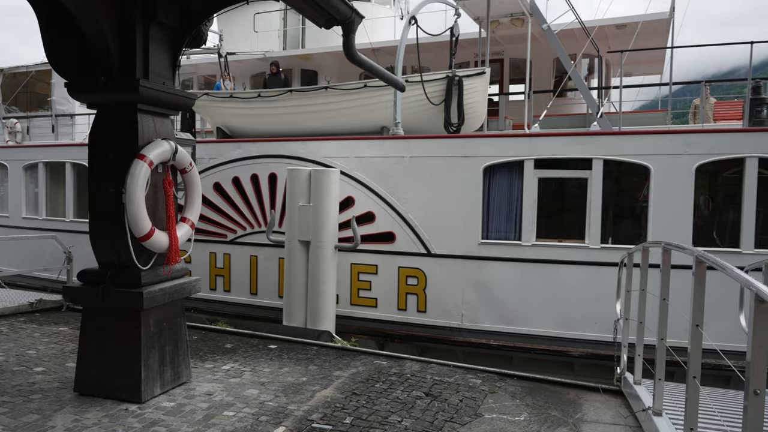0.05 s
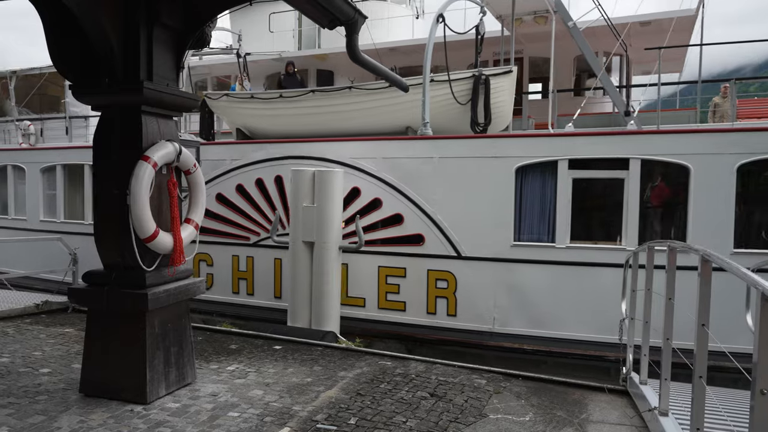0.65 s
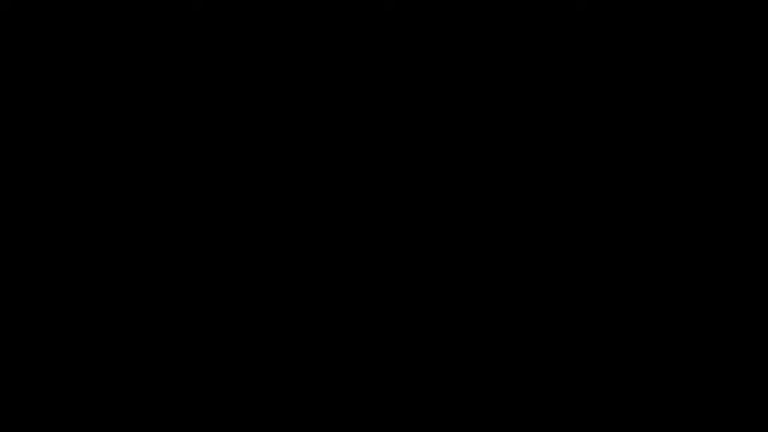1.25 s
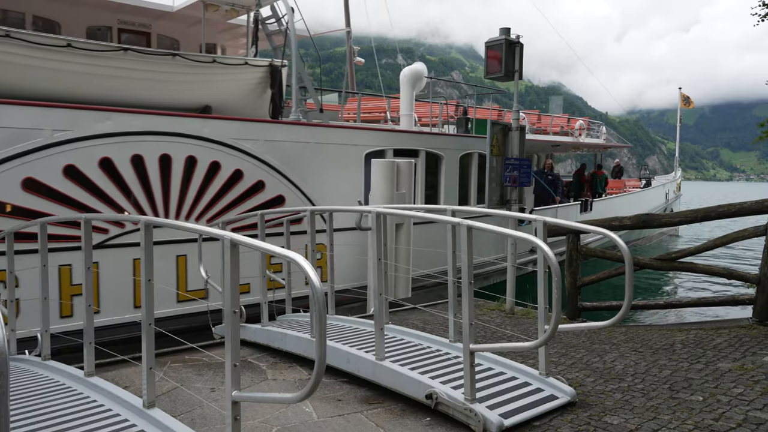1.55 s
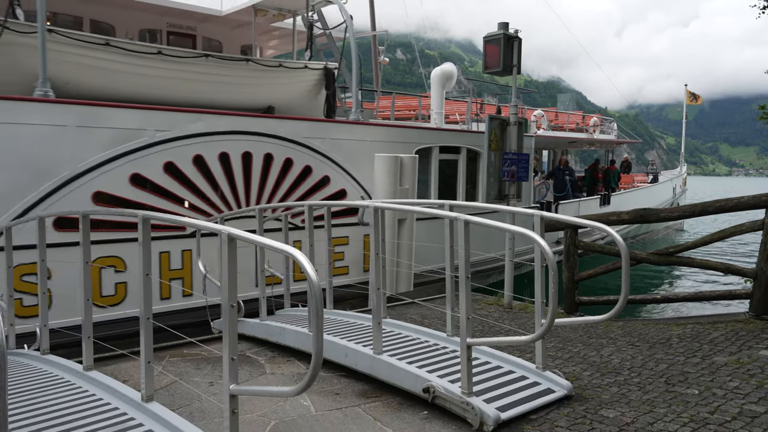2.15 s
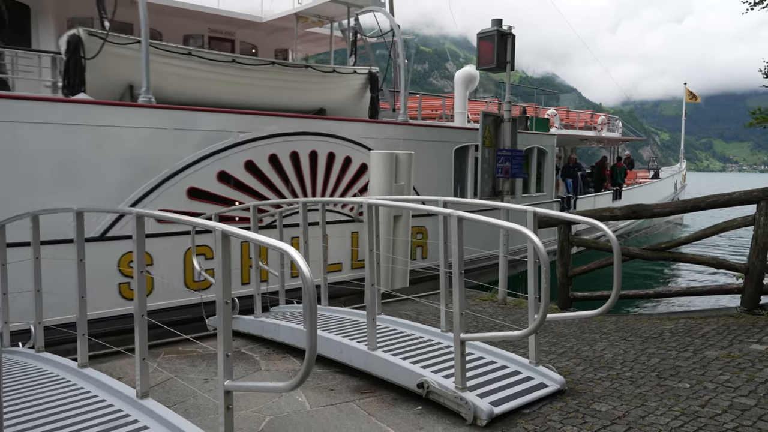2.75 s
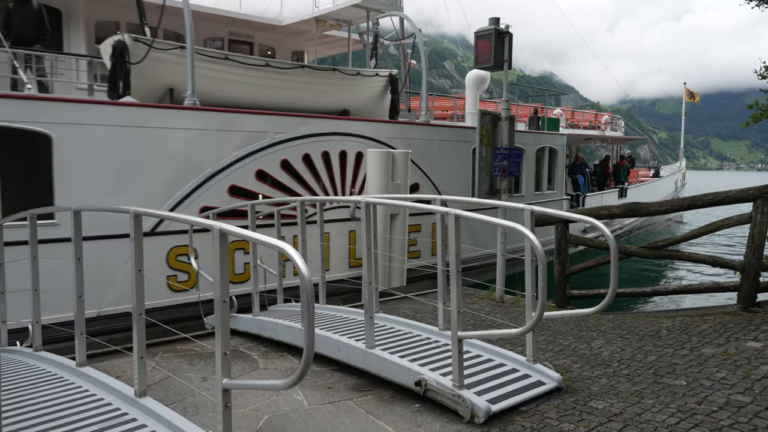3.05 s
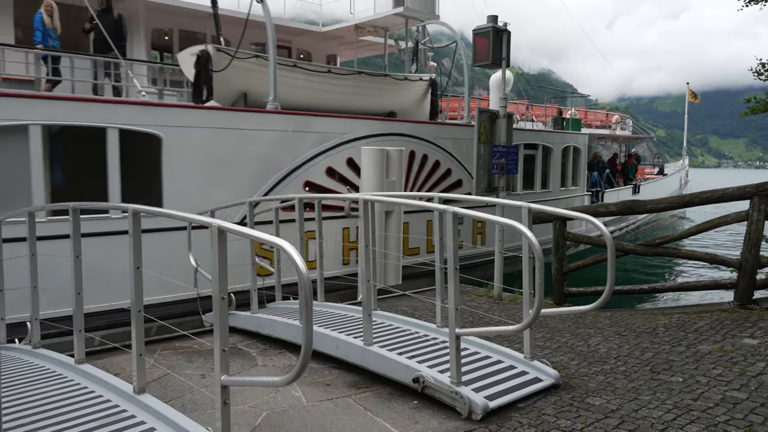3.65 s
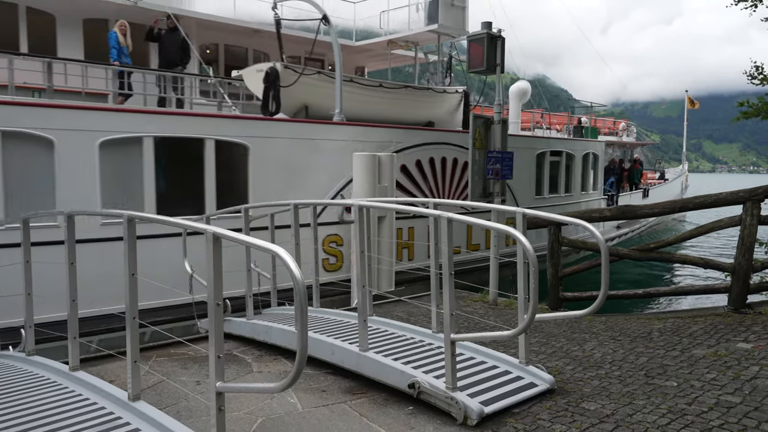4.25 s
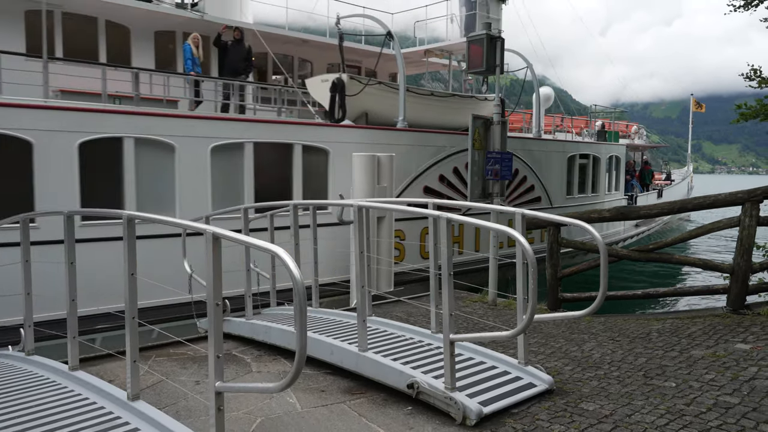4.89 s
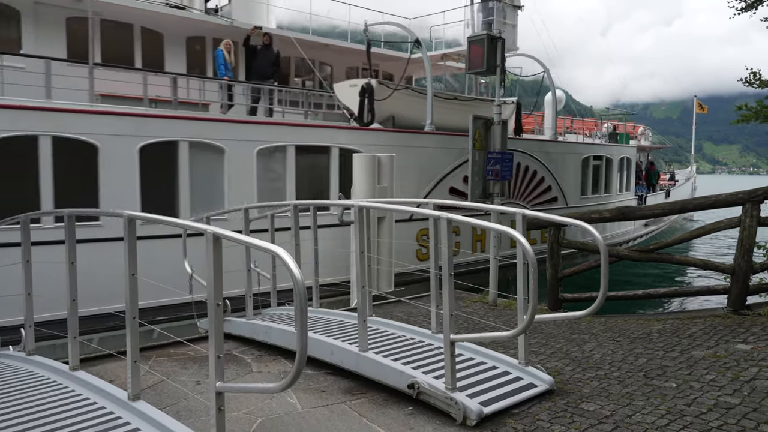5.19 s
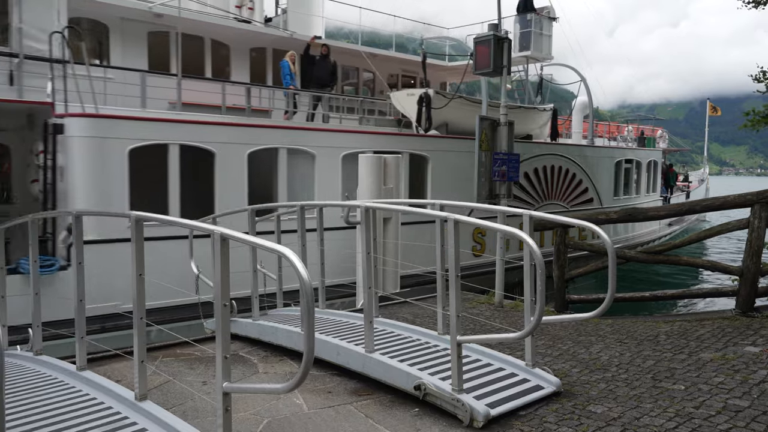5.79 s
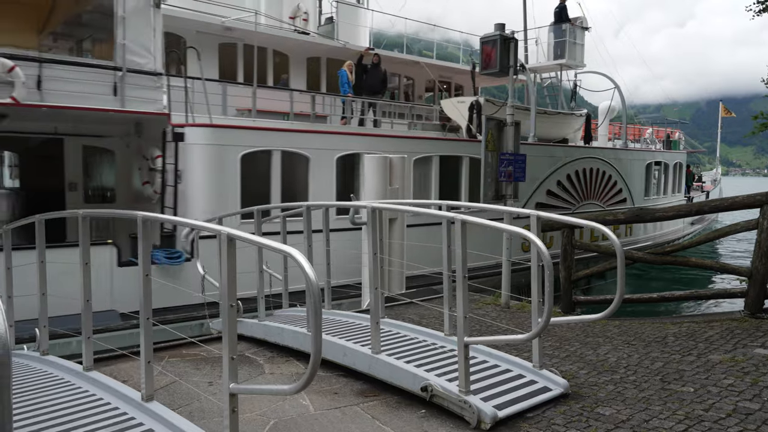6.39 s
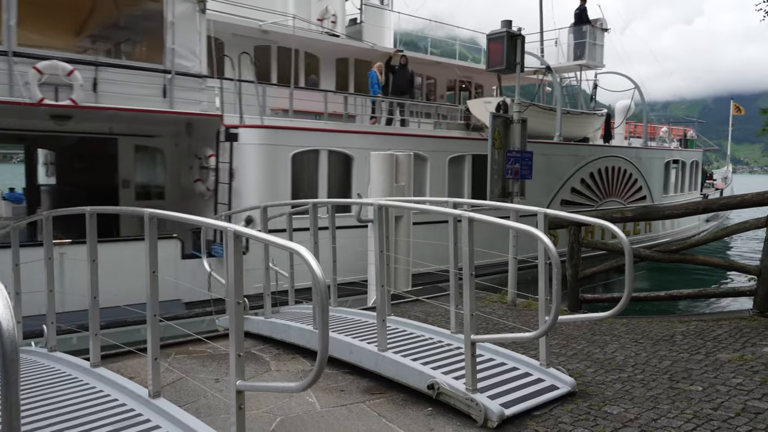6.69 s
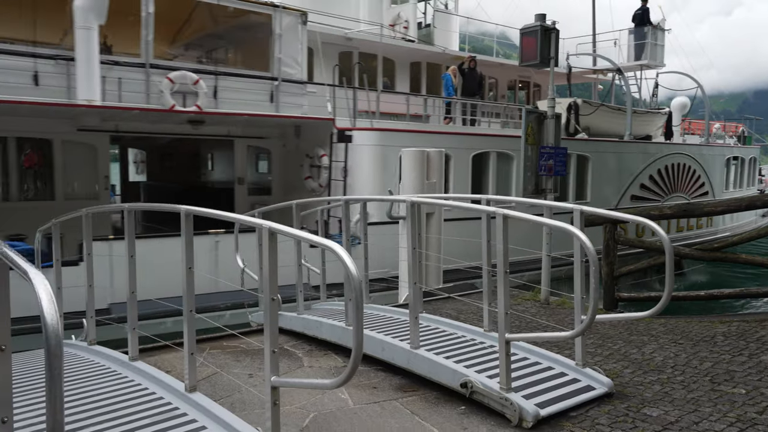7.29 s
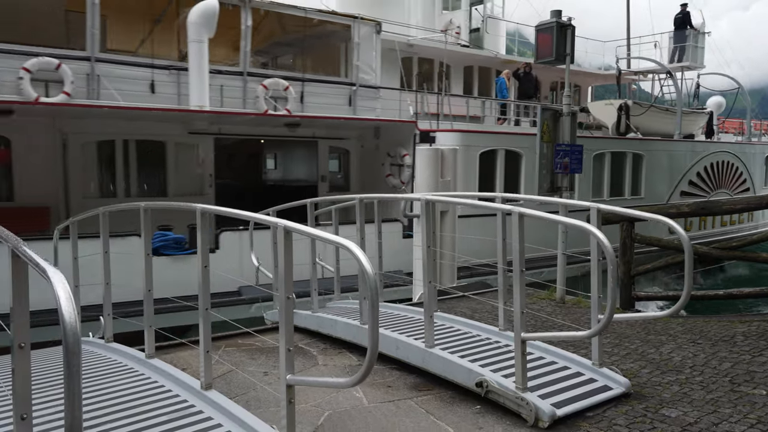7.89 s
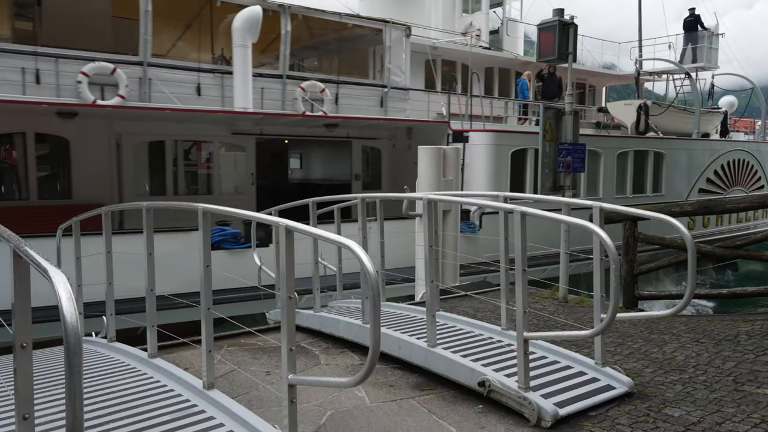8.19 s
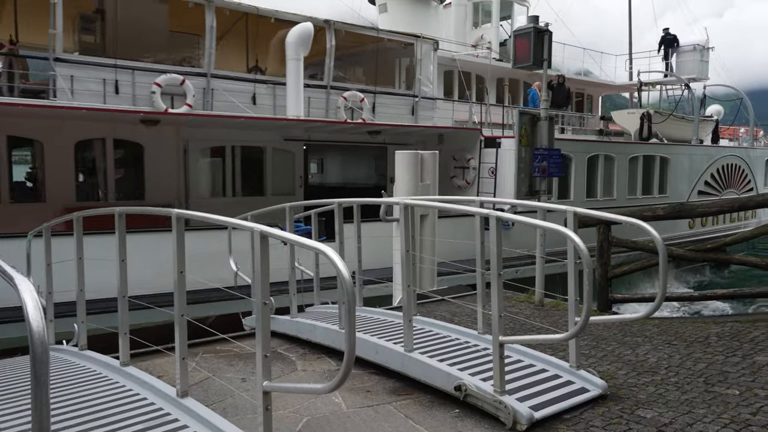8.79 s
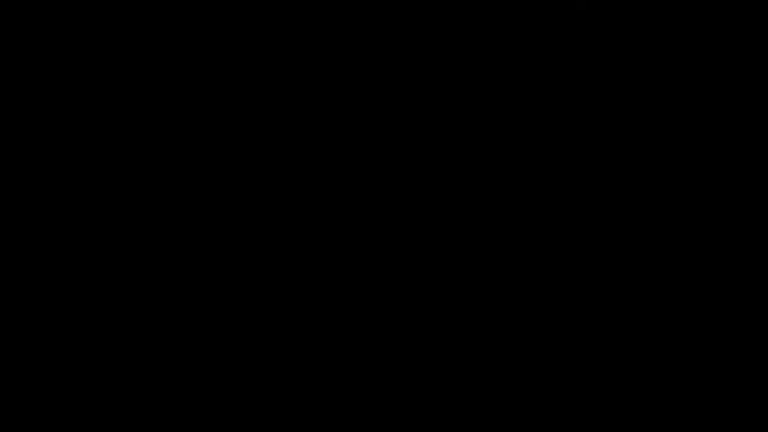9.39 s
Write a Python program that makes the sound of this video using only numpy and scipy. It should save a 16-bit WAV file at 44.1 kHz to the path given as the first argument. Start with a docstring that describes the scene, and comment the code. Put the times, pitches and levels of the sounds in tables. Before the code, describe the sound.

Rushing, bubbling water and hissing spray from a departing paddle steamer, with engine rumble beneath and a brief wind buffet early on.

```python
"""Paddle steamer leaving a stone quay

The wheel's floats beat air into the lake: small bubbles rush, big pockets gurgle and spray hisses,
over the rumble of the machinery. The microphone first faces the wheel and catches a gust.
After a short silence it is turned along the quay, and the wheel slowly recedes, left to right."""
import sys
import numpy as np
from scipy import signal
from scipy.fft import rfft, irfft, next_fast_len
from scipy.io import wavfile

SR = 44100
rng = np.random.default_rng(int(sys.argv[2]) if len(sys.argv) > 2 else 0)


def to_wav(s):
    """Save 16-bit WAV."""
    ch = np.atleast_2d(s).T  # columns
    pcm = np.round(np.clip(ch, -1, 1) * 32767)  # PCM
    wavfile.write(sys.argv[1], SR, pcm.astype(np.int16))


N = 420713
TIME_S = np.arange(N) / SR
FFT_SIZE = next_fast_len(N, True)
BINS_HZ = np.fft.rfftfreq(FFT_SIZE, 1 / SR)

# microphone on: start/s, fade-in/s, stop/s
STRETCHES = [(-.002, 0.0019, 1.207), (1.574, .022, 9.317)]
# air pockets dragged under: t/s, level/dB, f/Hz, swell of the wash/dB
AIR_GULPS = [(.85, -36, 220, 0), (1.62, -34, 270, .8), (2.0, -36, 190, 0.3), (3.1, -37.5, 260, 0),
             (3.8, -38, 220, 0), (4.33, -36, 280, 0.2), (5.2, -39, 230, .5), (6.07, -35, 175, 0.5),
             (6.52, -37.5, 190, .3), (7.6, -38.5, 290, .8)]

TURN_S, TURN_FADE_S = STRETCHES[1][:2]
TURNED = TIME_S > TURN_S - TURN_FADE_S


def wash(floats_per_s=3.3, far_from_s=3.0, far_over_s=4.1):
    """Small bubbles in turbulent water surge as each float dips; the colour turns hollow along the quay."""
    # wash spectra, near and far: f/Hz, level/dB
    near_spectrum = [(330, -24), (480, 0), (700, 0), (1000, -4), (1700, -4), (2300, -6), (3000, -13.5),
                     (4200, -23)]
    far_spectrum = [(330, -17.5), (510, -3), (680, 1), (1020, -6), (1320, -2), (1650, -5), (2150, -6),
                    (2800, -11.5), (4200, -21)]
    beat = np.cos(2 * np.pi * (floats_per_s * (TIME_S - 2.0) + .06 * drift(rate_hz=.93)))
    swarm = bubbles(low_hz=416, high_hz=3556, cycles=4.0, spread_db=.5, count=30000, samples=260)
    water = mic_pair(swarm + gain_of(8) * noise())
    far_share = np.where(TURNED, np.clip((TIME_S - far_from_s) / far_over_s, .15, 1), .89)
    water = (1 - far_share) * colour(water, near_spectrum) + far_share * colour(water, far_spectrum)
    gulp_db = sum(db * gulp_envelope(at_s) for at_s, _, _, db in AIR_GULPS)
    swell = gain_of(gulp_db + .3 * beat + .15 * drift(rate_hz=4))
    return water * swell * wheel_gain(base_db=-34.5, db_per_db=.68, facing_db=.3)


def gurgle(hollow_hz=315, sink_from_s=3.5, sink_hz_per_s=11.6):
    """Big air pockets boom in the paddle box; the hollow note between hull and quay wanders, then sinks."""
    pockets = bubbles(low_hz=120.5, high_hz=556.6, cycles=3.5, spread_db=.43, count=10000, samples=1100)
    # churn spectrum: f/Hz, level/dB
    spectrum = [(110, -20), (160, -9), (190, -1.5), (250, -1.5), (330, -1.5), (410, -3), (480, -9),
                (620, -28)]
    churn = colour(mic_pair(pockets + gain_of(4.5) * noise()), spectrum)
    note_hz = hollow_hz - sink_hz_per_s * np.maximum(TIME_S - sink_from_s, 0)
    hollow = resonate(mic_pair(noise()), note_hz * (1 + .059 * drift(rate_hz=5.5)), width_hz=90)
    water = unit_rms(churn + gain_of(-5.5) * hollow)
    return water * wheel_gain(base_db=-34.5, db_per_db=.8, facing_db=-.6)


def gulps():
    """Now and then a float drags down a big pocket of air, which booms at its own pitch."""
    boom = resonate(mic_pair(noise()), over_time(AIR_GULPS, column=2), width_hz=130)
    return boom * sum(gain_of(db) * gulp_envelope(at_s) for at_s, db, _, _ in AIR_GULPS)


def spray(mist_from_hz=9000, mist_facing_db=-1, mist_turned_db=1.5):
    """Countless drops fall back as hiss; the finest mist gives the top treble."""
    # spray spectrum: f/Hz, level/dB
    spectrum = [(2000, -16.5), (3000, 1), (3500, 0.5), (4400, -0.5), (5200, -.5), (6100, 1.5), (8500, -1),
                (11500, -2), (15500, -3)]
    drops = noise() * gain_of(1.1 * noise())
    hiss = colour(mic_pair(drops), spectrum)
    mist = signal.sosfiltfilt(signal.butter(1, mist_from_hz, "high", fs=SR, output="sos"), hiss)
    hiss += mist * (gain_of(np.where(TURNED, mist_turned_db, mist_facing_db)) - 1)
    flicker = gain_of(.08 * drift(rate_hz=20))
    return hiss * flicker * wheel_gain(base_db=-34.5, db_per_db=1, facing_db=1.5)


def slaps():
    """Sheets of water slap down: a quick swell, a short tail."""
    # slaps: t/s, peak/dB, length/s
    hits = [(.845, -29, .017), (1.69, -38, .02), (2.445, -35, .004)]
    # slap spectrum: f/Hz, level/dB
    spectrum = [(700, -22), (1700, -5), (3000, 0), (4500, -6), (7000, -12), (14000, -24)]
    envelope = np.zeros(N)
    for at_s, db, length_s in hits:
        age = 2 * np.maximum(TIME_S - at_s, 0) / length_s
        envelope += gain_of(db) * age * np.exp(1 - age)
    return envelope * colour(noise(), spectrum)


def machinery():
    """Engine and hull rumble, throbbing unevenly and swelling as openings in the ship's side pass."""
    # rumble spectrum: f/Hz, level/dB
    spectrum = [(20, -22), (35, -15.5), (58, -4), (85, -0.5), (150, -0.5), (185, -2), (260, -26.5)]
    # passing openings: t/s, swell/dB, half length/s
    openings = [(5.9, 2, .5), (7.7, 2.5, 0.25)]
    swell_db = sum(db * np.exp(-((TIME_S - at_s) / half_s) ** 2) for at_s, db, half_s in openings)
    rumble = colour(mic_pair(noise()), spectrum) * wheel_gain(base_db=-41, db_per_db=.55, facing_db=3.3)
    return rumble * gain_of(swell_db + .62 * drift(rate_hz=4.4))


def wind(breeze_db=-54.5, gust_db=-40.5, start_s=.58, rise_s=.24):
    """A breeze swells to a gust, buffeting each microphone port separately; gone after the turn."""
    # buffeting spectrum: f/Hz, level/dB
    spectrum = [(40, -14.5), (80, -6.5), (130, 3.5), (200, -7), (300, -12), (500, -25.5)]
    level_db = np.interp(TIME_S, [start_s, start_s + rise_s], [breeze_db, gust_db])
    return colour(noise(), spectrum) * ~TURNED * gain_of(level_db + 3 * drift(rate_hz=21))


def wind_thumps(hz=150, half_s=.0031):
    """Each puff pulls and pushes the diaphragms once, one harder than the other."""
    # puffs: t/s, level/dB, left-right/dB
    puffs = [(.833, -17.5, 4.5), (.92, -19.5, -1), (0.978, -22, 1), (1.063, -26.5, -6.5), (1.121, -24, 9)]
    out = np.zeros((2, N))
    for at_s, db, side_db in puffs:
        age_s = TIME_S - at_s
        pulse = np.sin(2 * np.pi * hz * age_s) * np.exp(-(age_s / half_s) ** 2)
        out += gain_of([[db + side_db / 2], [db - side_db / 2]]) * pulse
    return out


def wheel_gain(base_db, db_per_db, facing_db, usual_db=-38.5):
    """Gain of a layer that follows the wheel's loudness, with facing_db added before the turn."""
    # wheel working up, then receding: t/s, level/dB
    facing = [(0.0, -39.5), (0.6, -40), (0.848, -37), (1.2, -38.5)]
    leaving = [(1.62, -36.5), (3.63, -38), (4.01, -39), (5.38, -38.5), (6.39, -40.5), (6.94, -40.5),
               (9.02, -44), (9.3, -43.5)]
    excess_db = over_time(facing + leaving) - usual_db
    return gain_of(base_db + db_per_db * excess_db + np.where(TURNED, 0, facing_db))


def bubbles(low_hz, high_hz, cycles, spread_db, count, samples):
    """Two swarms; each bubble rings for a few cycles and rises in pitch as it nears the surface."""
    when, pitch, bulk = rng.random((count, 3)).T[:, :, None]
    hz = low_hz + (high_hz - low_hz) * pitch
    turns = hz * np.arange(samples) / SR
    age = turns / cycles
    ring = np.sin(2 * np.pi * turns * (1 + .025 * age)) * np.exp(-age) * np.linspace(1, 0, samples)
    ring *= np.sqrt(hz) * gain_of(spread_db * np.minimum(-np.log(1 - bulk), 4))
    index = (when * (2 * N - samples)).astype(int) + np.arange(samples)
    return unit_rms(np.bincount(index.ravel(), ring.ravel(), 2 * N).reshape(2, N))


def gulp_envelope(at_s, half_s=.14):
    """Swell and fall of one gulp."""
    return np.exp(-((TIME_S - at_s) / half_s) ** 2)


def mic_pair(sources, facing_lead_s=.00007, turned_lead_s=.00014, lead_from_hz=1100):
    """Two unrelated signals become stereo: alike in the bass, apart in the treble, where the left leads."""
    # microphone ports: f/Hz, coherence/1, left-right/dB
    ports = [(200, .998, .1), (330, .987, .6), (480, .86, 1.5), (720, .87, 1.2), (1000, .52, 2.2),
             (1380, .6, .4), (2400, .22, .5), (4300, .28, 1.2), (6000, .14, -2.6), (8300, .15, -.5),
             (15000, .1, 3)]
    common, separate = rfft(sources, FFT_SIZE)
    coherence = over_bins(ports)
    tilt = gain_of(over_bins(ports, column=2) / 2)
    norm = np.sqrt((tilt ** 2 + tilt ** -2) / 2)
    left = common * tilt / norm
    right = (coherence * common + np.sqrt(1 - coherence ** 2) * separate) / (tilt * norm)
    treble_rad_per_s = 2 * np.pi * BINS_HZ ** 3 / (BINS_HZ ** 2 + lead_from_hz ** 2)
    right_facing = waveform(right * np.exp(-1j * treble_rad_per_s * facing_lead_s))
    right_turned = waveform(right * np.exp(-1j * treble_rad_per_s * turned_lead_s))
    return np.array([waveform(left), np.where(TIME_S < TURN_S, right_facing, right_turned)])


def resonate(x, hz, width_hz):
    """Double-pole resonance that follows the curve hz; rms 1."""
    carrier = np.exp(2j * np.pi * np.cumsum(hz) / SR)
    pole = np.exp(-np.pi * width_hz / SR)
    return unit_rms((carrier * signal.lfilter([1], np.poly([pole, pole]), x / carrier)).real)


def colour(x, spectrum, skirt_db_per_octave=-40):
    """Filters by a spectrum that falls away beyond its ends; rms 1."""
    inside_hz = np.clip(BINS_HZ, spectrum[0][0], spectrum[-1][0])
    skirt_db = skirt_db_per_octave * abs(np.log2((BINS_HZ + 1) / (inside_hz + 1)))
    return unit_rms(waveform(rfft(x, FFT_SIZE) * gain_of(over_bins(spectrum) + skirt_db)))


def drift(rate_hz):
    """Slow random wander; rms 1."""
    return unit_rms(waveform(rfft(rng.standard_normal(FFT_SIZE)) / (1 + (BINS_HZ / rate_hz) ** 2)))


def over_time(rows, column=1):
    """Table column at every sample."""
    rows = np.asarray(rows)
    return np.interp(TIME_S, rows[:, 0], rows[:, column])


def over_bins(rows, column=1):
    """Table column at every bin, interpolated in log frequency."""
    rows = np.asarray(rows)
    return np.interp(np.log(BINS_HZ + 1), np.log(rows[:, 0] + 1), rows[:, column])


def waveform(bins):
    return irfft(bins, FFT_SIZE)[..., :N]


def noise():
    return rng.standard_normal((2, N))


def gain_of(db):
    return 10 ** (np.asarray(db) / 20)


def unit_rms(x):
    return x / np.sqrt(np.mean(x ** 2) + 1e-20)


def scene(pan_start_db=1.93, pan_db_per_s=-.49):
    """After the turn the wheel crosses from left to right above the centred rumble."""
    side_db = np.array([[.5], [-.5]]) * TURNED * (pan_start_db + pan_db_per_s * (TIME_S - TURN_S))
    bright_water = (wash() + spray()) * gain_of(side_db)
    deep_water = (gurgle() + gulps()) * gain_of(.7 * side_db)
    return bright_water + deep_water + slaps() + machinery() + wind() + wind_thumps()


def record(dry, fade_out_s=.003, cutoff_hz=15850):
    """The microphone switches on and off; a steep low-pass follows."""
    gate = sum(np.clip((TIME_S - start_s) / fade_in_s, 0, 1) * np.clip((stop_s - TIME_S) / fade_out_s, 0, 1)
               for start_s, fade_in_s, stop_s in STRETCHES)
    lowpass = signal.firwin(767, cutoff_hz, window=("kaiser", 9), fs=SR)
    return signal.oaconvolve(dry * gate, lowpass[None], "same")


dry = scene()
out = record(dry)
to_wav(out)
```